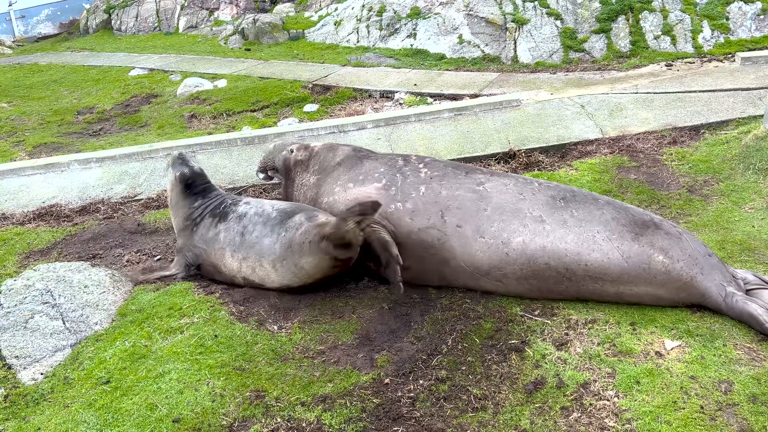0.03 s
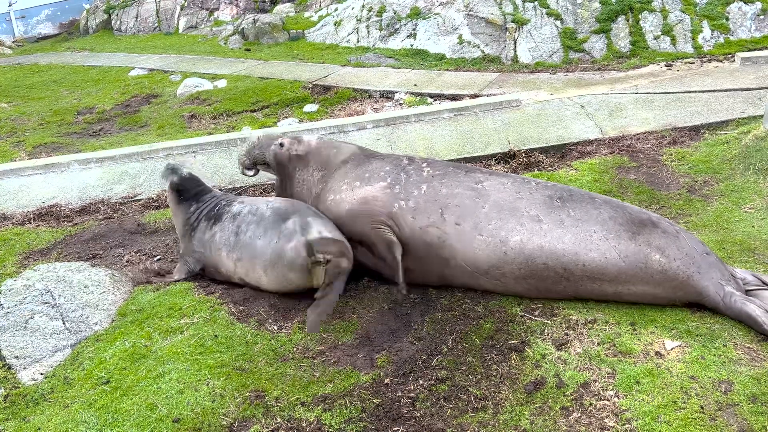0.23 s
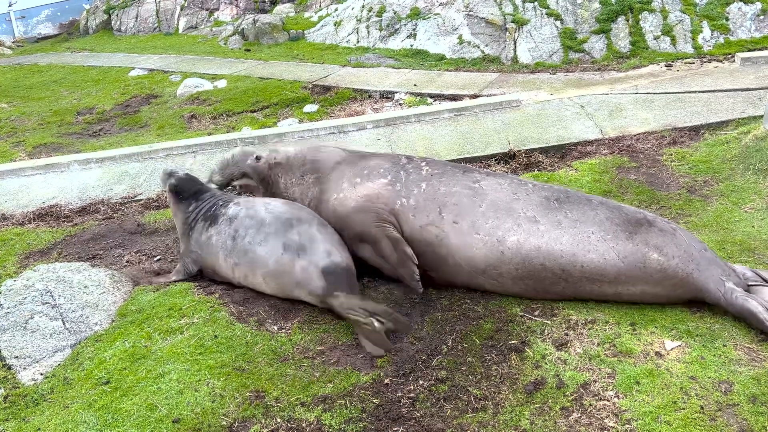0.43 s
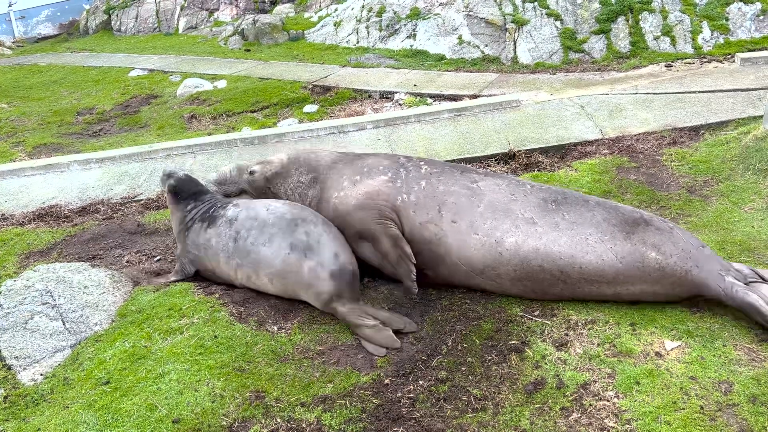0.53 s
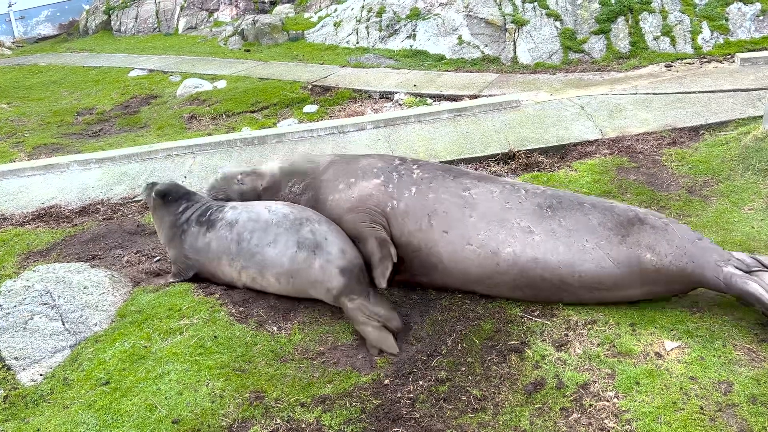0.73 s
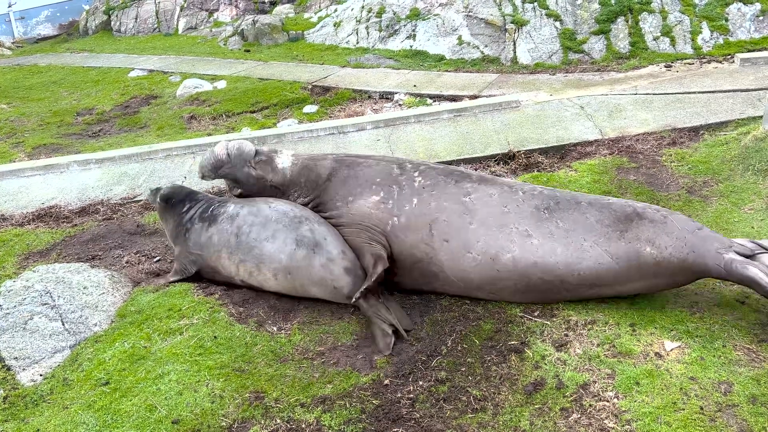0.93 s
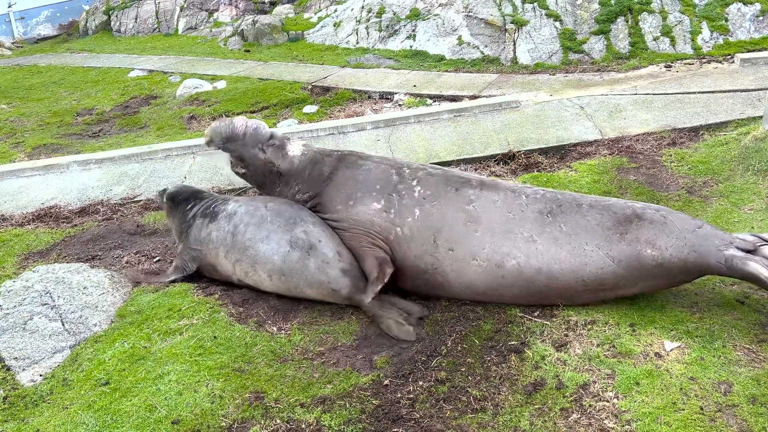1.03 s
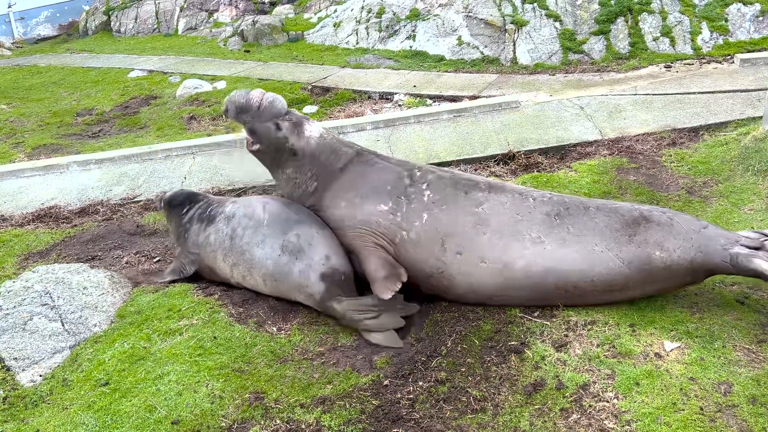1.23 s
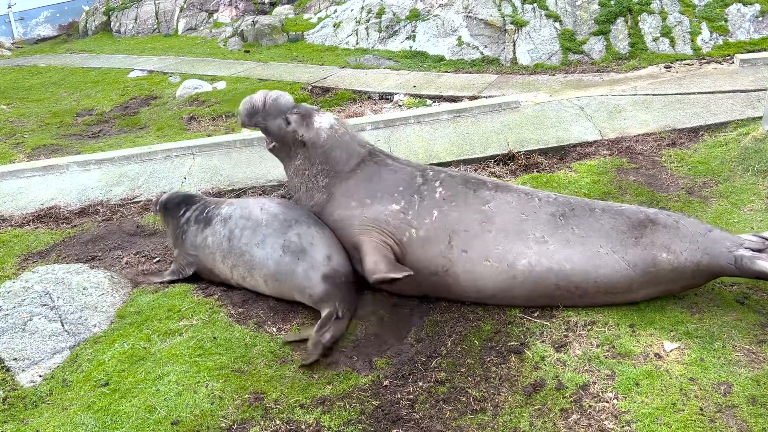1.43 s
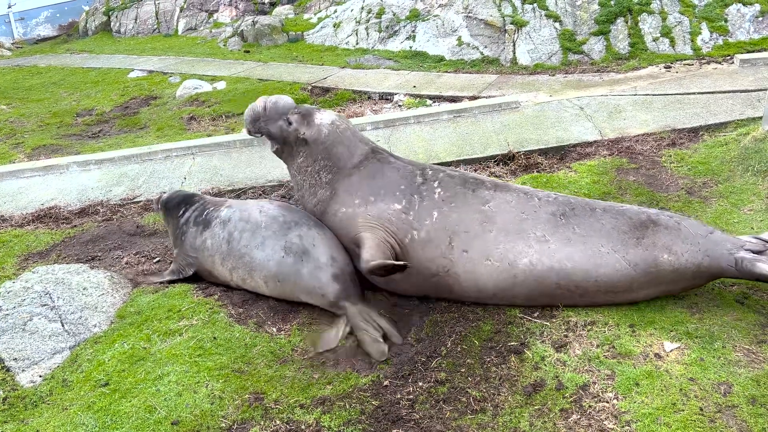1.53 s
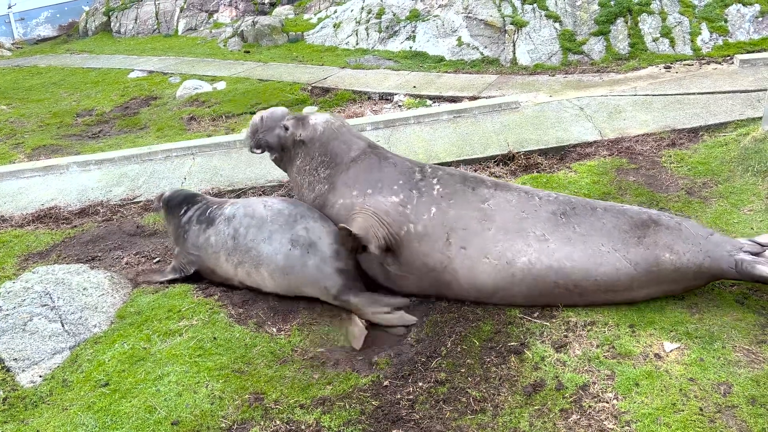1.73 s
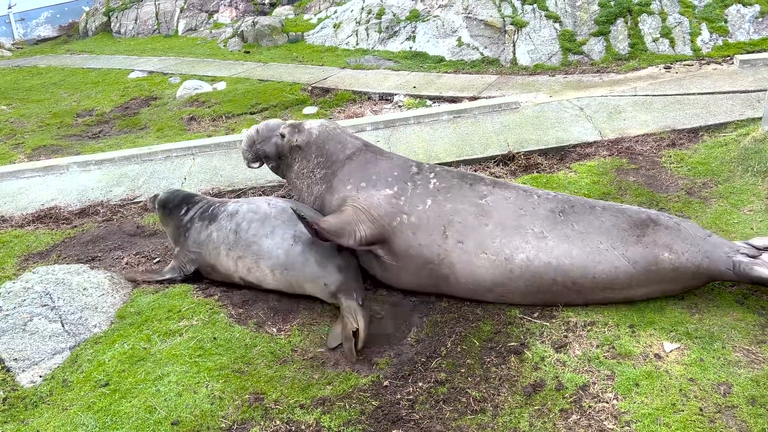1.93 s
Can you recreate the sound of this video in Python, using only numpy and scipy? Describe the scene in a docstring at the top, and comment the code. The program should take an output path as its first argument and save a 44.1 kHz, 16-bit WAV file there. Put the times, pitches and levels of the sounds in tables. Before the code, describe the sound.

A large seal's rough roar, slightly to the left, grows from a rasp into a wet, clapping roll and dies in a gargle. Soil scrapes and rumbles beneath it, then come a flipper slap and a soft thud in quiet open air.

```python
"""A bull elephant seal roars on open, grassy ground, his heavy body scraping over gritty, rumbling soil. He
opens with a rough rasp, throaty knocks and a snort, then goes into a roll of slow, wet throat claps whose
resonance sinks and rises again, ending in a weak gargle. A flipper slaps his body with a deep thud. Last, a
faint call sounds far off. Soft outdoor air and a thin echo lie under it all."""
import sys
import numpy as np
from scipy import signal
from scipy.fft import rfft, irfft, next_fast_len
from scipy.io import wavfile
from scipy.ndimage import map_coordinates

SR = 44100
rng = np.random.default_rng(int(sys.argv[2]) if len(sys.argv) > 2 else 0)


def log_audio(samples):
    """Write samples as a 16-bit WAV file to the path given in sys.argv[1]."""
    # one column per channel
    frames = np.atleast_2d(samples).T
    # limit to full scale, then quantise
    limited = np.clip(frames, -1, 1)
    pcm = np.round(limited * 32767).astype(np.int16)
    wavfile.write(sys.argv[1], SR, pcm)


N = 88200

# lowest throat resonance, in the roll and the gargle: time_s, pitch_hz
THROAT_PITCH = [(.465, 301), (.56, 274), (.632, 254.5), (.668, 235), (.71, 215), (.78, 246), (.85, 249.3),
                (.885, 294), (.97, 255), (1.02, 373), (1.16, 342.5)]
# tone colour of mouth clicks and grit ticks: frequency_hz, level_db
CLICK_SPECTRUM = [(300, -15), (900, -2.5), (1500, 8.5), (2300, -7.5), (3500, -7), (5400, -6), (9000, -30),
                  (15000, -35)]


def amp(db):
    """Decibels to gain."""
    return 10 ** (np.asarray(db) / 20)


def unit(x):
    """Scale to rms 1."""
    return x / np.sqrt(np.mean(x ** 2) + 1e-20)


def at_hz(points, hz):
    """Read a curve over frequency, on a log axis."""
    frequencies, values = np.transpose(points)
    return np.interp(np.log(hz + 1), np.log(frequencies + 1), values)


def at_time(points, s):
    """Read a curve over time."""
    return np.interp(s, *np.transpose(points))


def clock():
    """The time of every sample, in seconds."""
    return np.arange(N) / SR


def wobble(knots_per_s):
    """A random curve that glides from knot to knot."""
    return map_coordinates(rng.standard_normal(N // 8), [clock() * knots_per_s], order=1)


def filtered(x, response):
    """Shape a sound with a frequency response."""
    size = next_fast_len(N + SR // 2)
    return irfft(rfft(x, size) * response(np.fft.rfftfreq(size, 1 / SR)), size)[..., :N]


def noise(spectrum, spread):
    """Coloured stereo noise of rms 1; spread is the gain of the part each side has alone."""
    white = rng.standard_normal(N) + spread * rng.standard_normal((2, N))
    return unit(filtered(white, lambda hz: amp(at_hz(spectrum, hz))))


def add(track, start_s, sound):
    """Mix a sound into a track."""
    part = track[max(0, round(start_s * SR)):][:len(sound)]
    part += sound[:len(part)]


def bursts(hits, spectrum):
    """Short, grainy noise bursts of one colour, each with a sharp attack."""
    t, envelope = clock(), np.zeros(N)
    attack = 1 - np.exp(-t / 0.0005)
    for start_s, level_db, t60_s in hits:
        add(envelope, start_s, amp(level_db - 60 * t / t60_s) * attack)
    return envelope * unit(noise(spectrum, spread=0.94) * amp(wobble(700)))


def ring(hz, rise_s, t60_s, sharp=0, sag_s=0.0024):
    """One resonance that swells and dies; it starts high by the share `sharp` and sags to pitch."""
    t = np.arange(SR // 3) / SR
    envelope = (1 - np.exp(-(t / rise_s) ** 2)) * amp(-60 * t / t60_s)
    cycles = hz * (t + sharp * sag_s * (1 - np.exp(-t / sag_s)))
    return envelope / envelope.max() * np.sin(2 * np.pi * cycles)


def outdoor_air():
    """A faint, steady, wide bed of air."""
    spectrum = [(25, -2), (70, -6), (200, -13.5), (370, 6), (520, -2), (700, -4.5), (1000, -12.5),
                (2000, -16), (5000, -30), (15000, -35)]  # frequency_hz, level_db
    return amp(-54) * noise(spectrum, spread=1.0)


def echo(sound, level_db=-19, t60_s=.16, low_cut_hz=500):
    """A weak, thin answer from a low wall and rocks."""
    t = np.arange(SR // 2) / SR
    envelope = amp(-60 * t / t60_s) * (1 - np.exp(-t / 0.0033))
    tail = rng.standard_normal((2, len(t))) * envelope
    tail /= np.linalg.norm(tail[0])
    thin = filtered(sound, lambda hz: hz / np.hypot(hz, low_cut_hz))
    return amp(level_db) * signal.fftconvolve(thin, tail, axes=1)[:, :N]


def far_call(pitch_hz=480, waver=.025, octave_db=-8.5):
    """A wavering tone and its octave, probably another seal far away."""
    swell = [(1.68, -92), (1.8, -51.5), (1.95, -55), (2, -49.5)]  # time_s, level_db
    phase = 2 * np.pi * np.cumsum(pitch_hz * (1 + waver * wobble(82))) / SR
    flicker_db = 4 * wobble(45)
    envelope = amp(at_time(swell, clock()) + flicker_db) * (clock() > swell[0][0])
    return envelope * (np.sin(phase) + amp(octave_db) * np.sin(2 * phase))


def ground():
    """The ground rumbles under his weight, and a deep thud sounds as a flipper slaps his body."""
    swell = [(0, -50.5), (.15, -35), (.3, -32), (.36, -30.5), (.65, -27), (.82, -30), (.95, -40.5),
             (1.12, -34), (1.22, -52.5), (1.34, -41), (1.5, -44), (1.72, -53.5), (1.91, -48.5), (2, -60.5)]  # time_s, level_db
    spectrum = [(20, -51), (40, 4), (60, 0), (110, -5.5), (170, -13.5), (300, -11.5), (900, -98.5)]  # frequency_hz, level_db
    rumble = amp(at_time(swell, clock())) * noise(spectrum, spread=0.17)
    thud = np.zeros(N)
    add(thud, start_s=1.375, sound=amp(-34.5) * ring(hz=56.2, rise_s=0.027, t60_s=0.47))
    return rumble + thud


def scrape(low_cut_hz=800):
    """Gritty soil hisses and crackles under the sliding body."""
    swell = [(0, -60), (.08, -51), (.2, -41.5), (.29, -42.5), (.34, -45.5), (.42, -38), (.52, -45.5),
             (.6, -46.5), (.7, -49), (.84, -56), (1.03, -52), (1.22, -57), (1.5, -54), (1.72, -66),
             (1.86, -61.5), (2, -75)]  # time_s, level_db
    grit = [(1000, 2), (1500, -5.5), (2000, -3.5), (2600, -11), (3400, -10), (5000, -14.5), (8500, -14.5),
            (11000, -26.5), (15500, -26)]  # colour ahead of the low cut: frequency_hz, level_db
    hiss = filtered(noise(grit, spread=0.93), lambda hz: 1 / np.sqrt(1 + (low_cut_hz / (hz + 1)) ** 6))
    grain = amp(2.2 * wobble(110) + 2.8 * wobble(1100))
    return amp(at_time(swell, clock())) * unit(hiss * grain)


def flipper():
    """A flipper slaps and scuffs the soil, and grit ticks under it."""
    slaps = [(1.356, -32, 0.1), (1.3725, -30.5, 0.049), (1.485, -40, .06), (1.72, -42.5, 0.047),
             (1.88, -48.5, 0.19)]  # start_s, level_db, t60_s
    hide = [(80, -2.5), (350, 12), (700, 2.5), (1200, 0), (1700, -17), (2500, -9), (4500, -31), (9000, -31),
            (15000, -53)]  # dull colour of hide on soil: frequency_hz, level_db
    ticks = [(1.36, -41.5, 0.033), (1.428, -41.5, .035), (1.552, -50.5, .04)]  # start_s, level_db, t60_s
    return bursts(slaps, hide) + bursts(ticks, CLICK_SPECTRUM)


def clap_times(start_s=.464, end_s=.9):
    """The throat claps at the start of the roll and each time its rate completes a cycle."""
    clap_rate = [(.4763, 32.4), (.4982, 54), (.5637, 28.5), (.6694, 29.85), (.6769, 39), (.8352, 28.2)]  # time_s, claps_per_s
    span = np.arange(start_s, end_s, 1 / SR)
    cycles = np.cumsum(at_time(clap_rate, span)) / SR
    return np.interp(np.arange(int(cycles[-1]) + 1), cycles, span)


def saliva(t60_s=0.066):
    """The wet mouth crackles in its upper resonances with every clap, and clicks now and then."""
    sputter_strength = [(.465, -29), (.492, -24), (.513, -40), (.535, -32.5), (.565, -40.5), (.6, -41),
                        (.69, -41), (.76, -47.5), (.815, -40.5), (.885, -46.5)]  # time_s, level_db
    wet_modes = [(520, 280, 0.5), (780, 400, -2), (1250, 400, -7.5), (1650, 250, -8), (1973, 130, 5.5),
                 (2653, 160, -3), (2914, 62, -2), (5200, 500, -22.5)]  # mouth resonances: centre_hz, width_hz, level_db
    clicks = [(.237, -32, 0.023), (.5615, -31.5, 0.06), (.881, -36, 0.026), (.937, -49.5, 0.028),
              (1.047, -40.5, .04), (1.156, -41, 0.038), (1.279, -44.5, 0.046)]  # start_s, level_db, t60_s

    def cavity(hz):
        """Band-pass resonances side by side, in alternating polarity."""
        return sum((-1) ** k * amp(db) * 1j * hz * width / (centre ** 2 - hz ** 2 + 1j * hz * width)
                   for k, (centre, width, db) in enumerate(wet_modes))

    envelope = np.zeros(N)
    for start_s in clap_times():
        add(envelope, start_s, amp(at_time(sputter_strength, start_s) - 60 * clock() / t60_s))
    crackle = rng.standard_normal(N) * amp(6.2 * wobble(500))
    sputter = filtered(envelope * crackle, cavity) / np.std(filtered(crackle, cavity))
    return sputter + bursts(clicks, CLICK_SPECTRUM)


def snort(boost_db=1):
    """Air bursts through the trunk-like nose and flutters as the roll starts."""
    swell = [(.43, -60), (.436, -37), (.47, -38), (.52, -41), (.56, -48), (.62, -62)]  # ahead of the boost: time_s, level_db
    nose = [(300, -8), (500, 7), (1200, -27.5), (1600, -13.5), (2050, -8), (2600, -1), (3500, -8.5),
            (5200, -9.5), (8500, -11), (11000, -22), (15500, -26)]  # nasal colour: frequency_hz, level_db
    t = clock()
    gate = (t > swell[0][0]) & (t < swell[-1][0])
    breath = unit(noise(nose, spread=1.0) * amp(2 * wobble(200) + 2 * wobble(1200)))
    return gate * amp(boost_db + at_time(swell, t)) * breath


def knocks():
    """Single pops of the throat, each with two resonances."""
    pops = [(.186, -32.5, 515, 910, 1.5, 0.017), (0.208, -19, 420, 640, -9, 0.021),
            (.237, -13, 393, 688, -4, 0.013), (0.261, -20, 383, 894, -4.5, 0.052),
            (0.35, -12.5, 463, 585, -6, 0.049), (.3935, -9, 376, 514, -3.5, 0.019),
            (.399, -5, 522, 374, -5.5, 0.019), (0.88, -22.5, 674, 1192, -7, 0.021),
            (1.046, -27, 380, 910, -5, 0.043), (1.081, -32, 366, 887, -3, 0.025),
            (1.155, -21, 353, 1994, -17.5, 0.088), (1.225, -28.5, 380, 835, -26, 0.047),
            (1.28, -32, 369, 2360, -18.5, 0.036)]  # start_s, level_db, first_hz, second_hz, second_relative_db, t60_s
    track = np.zeros(N)
    for start_s, level_db, first_hz, second_hz, second_db, t60_s in pops:
        first = ring(first_hz, rise_s=0.0025, t60_s=t60_s)
        second = amp(second_db) * ring(second_hz, rise_s=0.006, t60_s=t60_s)
        add(track, start_s, amp(level_db) * (first + second))
    return track


def mouth(modes, rise_s, scatter_db, detune):
    """One pulse rings the mouth's resonances, each a little off in level and pitch."""
    chance = rng.standard_normal((len(modes), 2))
    return sum(amp(db + scatter_db * level_draw) * ring(hz * np.exp(detune * pitch_draw), rise_s, t60_s)
               for (hz, db, t60_s), (level_draw, pitch_draw) in zip(modes, chance))


def flutter_times(curve, pulses_per_s, uneven):
    """Uneven pulse times over the span of a curve."""
    gaps_s = np.exp(uneven * rng.standard_normal(80)) / pulses_per_s
    times = curve[0][0] + np.cumsum(gaps_s)
    return times[times < curve[-1][0]]


def gargle(rise_s=0.0013):
    """The throat goes on fluttering weakly after the roll."""
    effort = [(.9, -25.5), (.97, -23), (1.05, -20.5), (1.11, -25), (1.15, -32.5), (1.3, -44)]  # pulse strength: time_s, level_db
    modes = [(550, -14, 0.0085), (902, -21.5, 0.016), (1250, -31.5, 0.014), (1850, -21, 0.028)]  # mouth resonances: pitch_hz, level_db, t60_s
    track = np.zeros(N)
    for start_s in flutter_times(effort, pulses_per_s=72, uneven=0.22):
        gain = amp(at_time(effort, start_s) + rng.normal(0, 0.5))
        deep = ring(at_time(THROAT_PITCH, start_s), rise_s, t60_s=0.063)
        upper = mouth(modes, rise_s, scatter_db=4.5, detune=0.086)
        add(track, start_s, gain * (deep + upper))
    return track


def rasp():
    """Fast, ragged pulses through the open mouth begin the roar."""
    effort = [(.035, -37), (.08, -35.5), (.16, -30.5), (.21, -21.5), (.27, -22.5), (.3, -27), (.34, -32.5),
              (.42, -35.5)]  # pulse strength: time_s, level_db
    modes = [(248, -8, 0.067), (385.8, -1, 0.088), (510, 0.5, 0.029), (679, -6, 0.03), (897, -9.5, 0.023),
             (2060, -25, .03), (2474, -24, 0.065), (3010, -26, .03)]  # open-mouth resonances: pitch_hz, level_db, t60_s
    track = np.zeros(N)
    for start_s in flutter_times(effort, pulses_per_s=120, uneven=0.29):
        gain = amp(at_time(effort, start_s) + rng.normal(0, 1.4))
        add(track, start_s, gain * mouth(modes, rise_s=.0012, scatter_db=4.0, detune=0.038))
    return track


def roll(puff_db=-15, puff_hz=77.5, puff_delay_s=0.0076):
    """Slow claps of the throat: each rings the deep resonance and the mouth, and pushes out air."""
    effort = [(.465, -12.5), (.495, -16), (.535, -11), (.565, -13), (.6, -8), (.635, -2.5), (.72, -4),
              (.785, -4.5), (.815, -7), (.848, -13), (.885, -16)]  # clap strength: time_s, level_db
    modes = [(352, -18.5, 0.037), (518, -22.5, 0.023), (730, -23.5, 0.084), (1198, -36, 0.062)]  # mouth resonances: pitch_hz, level_db, t60_s
    track, t = np.zeros(N), np.arange(SR // 3) / SR
    # one bassy pressure swing, placed so that it peaks puff_delay_s after the clap
    from_peak = np.pi * puff_hz * (t - 2 * puff_delay_s)
    puff = amp(puff_db) * (2 * from_peak ** 2 - 1) * np.exp(-from_peak ** 2)
    for start_s in clap_times():
        gain = amp(at_time(effort, start_s))
        deep = ring(at_time(THROAT_PITCH, start_s), rise_s=0.0037, t60_s=0.073, sharp=0.2)
        upper = mouth(modes, rise_s=0.0021, scatter_db=3.0, detune=.025)
        add(track, start_s, gain * (deep + upper))
        add(track, start_s - puff_delay_s, gain * puff)
    return track


def scene():
    """The seal's sound reaches the left microphone first; echo and outdoor air lie under it."""
    balance = [(100, -.5), (200, -1), (380, 2.2), (700, 2.5), (1300, 5.5), (2400, -0.5), (4400, 7),
               (9000, 0)]  # stereo tilt: frequency_hz, left_minus_right_db
    left_lead = [(100, .00038), (250, .00028), (550, .00023), (1100, .00031), (2200, .00036)]  # earlier arrival on the left: frequency_hz, lead_s
    side = np.array([[.5], [-.5]])

    def placement(hz):
        """Split the level tilt and the time lead between left and right."""
        gain = amp(side * at_hz(balance, hz))
        return gain * np.exp(2j * np.pi * hz * side * at_hz(left_lead, hz))

    voice = roll() + rasp() + gargle() + knocks() + snort() + saliva()
    movement = scrape() + flipper() + ground()
    direct = filtered(voice + movement + far_call(), placement)
    return direct + echo(direct) + outdoor_air()


def record(dry, low_cut_hz=55, top_hz=15800):
    """The microphone drops the deepest bass and keeps nothing above its band limit."""
    thin = filtered(dry, lambda hz: 1 / np.sqrt(1 + (low_cut_hz / (hz + 1)) ** 8))
    return filtered(thin, lambda hz: hz < top_hz)


dry = scene()
out = record(dry)
log_audio(out)
```